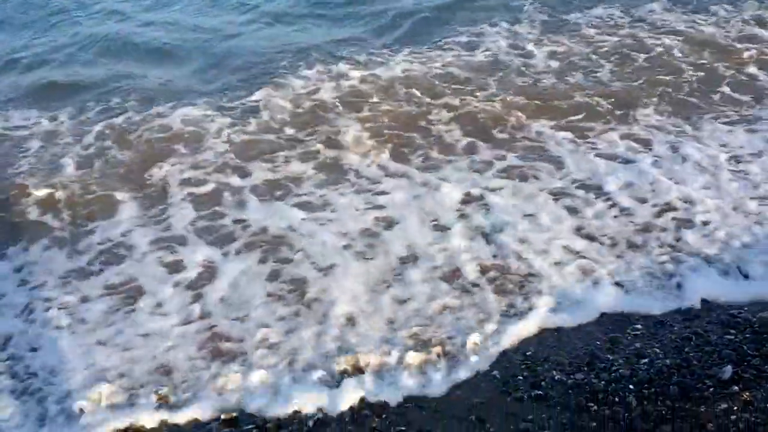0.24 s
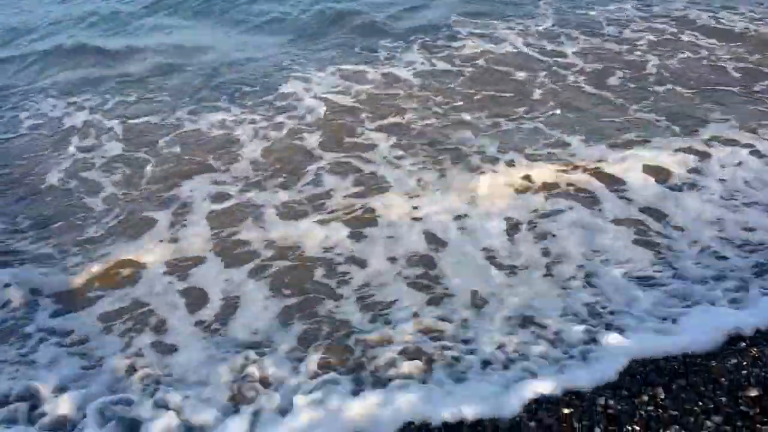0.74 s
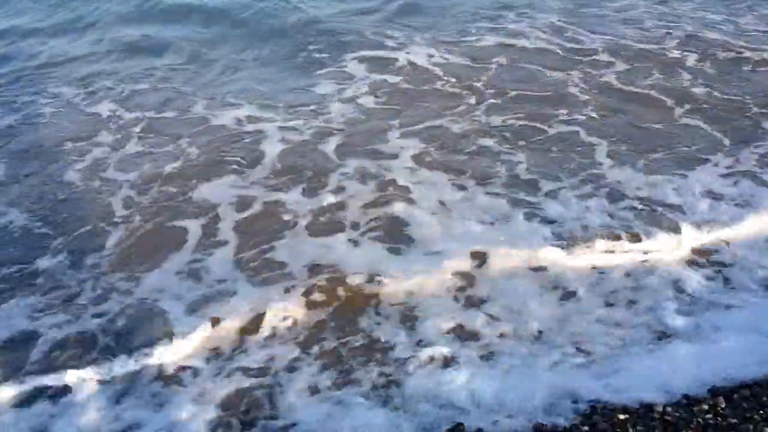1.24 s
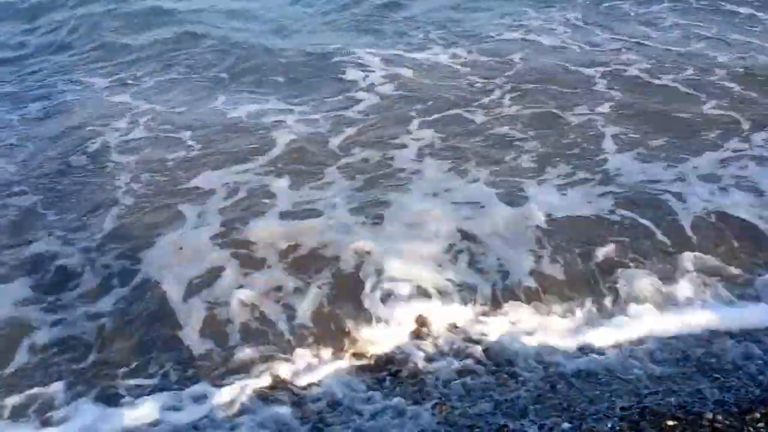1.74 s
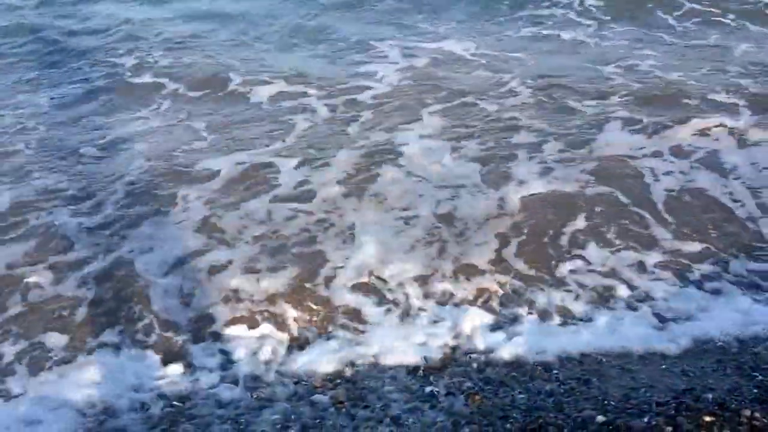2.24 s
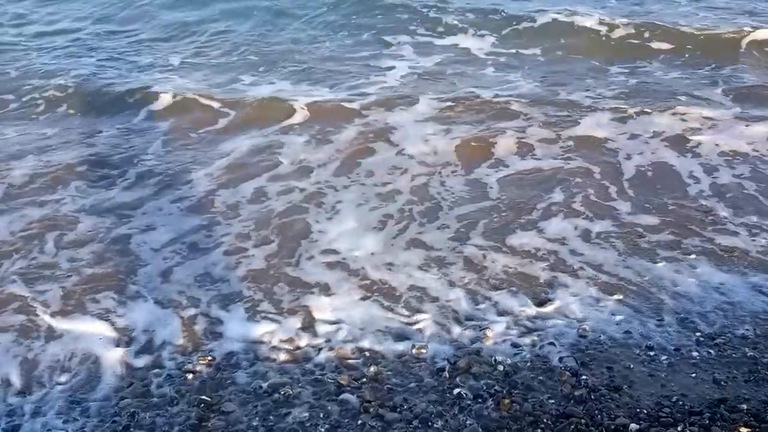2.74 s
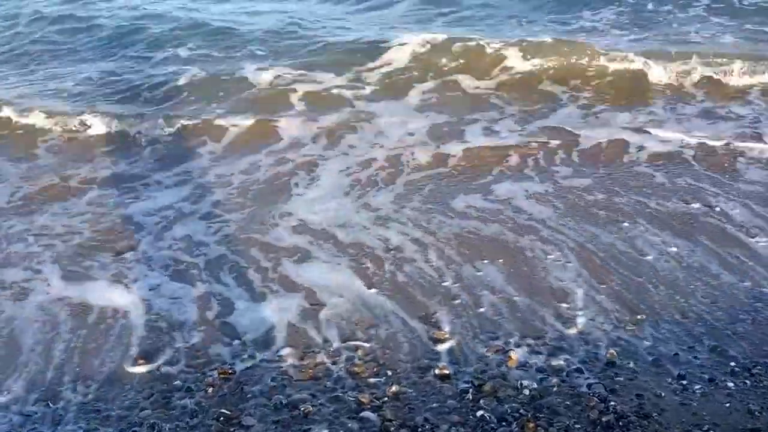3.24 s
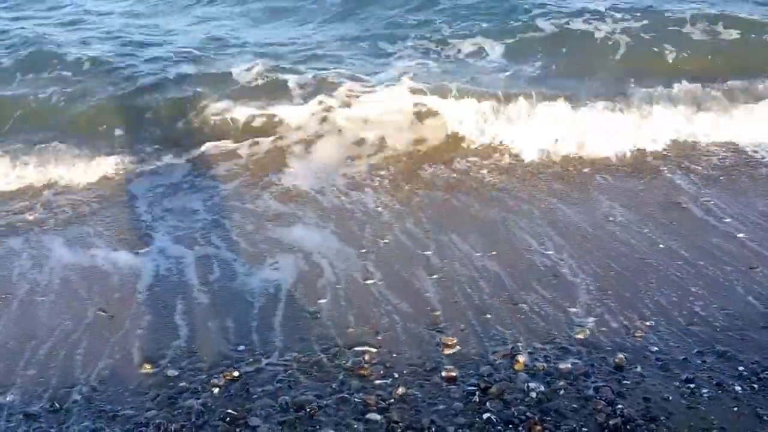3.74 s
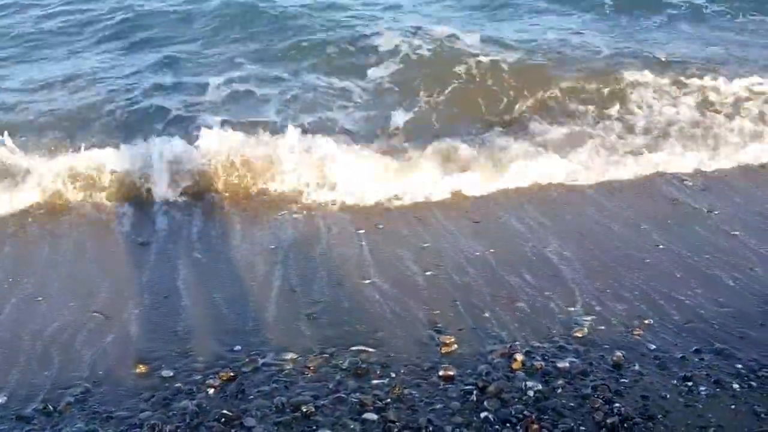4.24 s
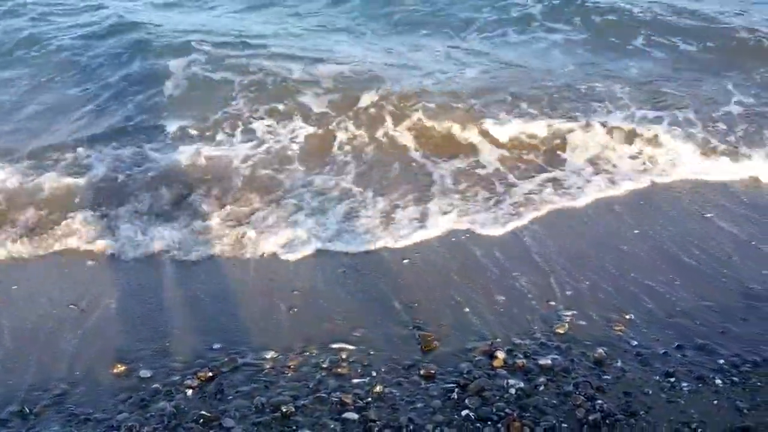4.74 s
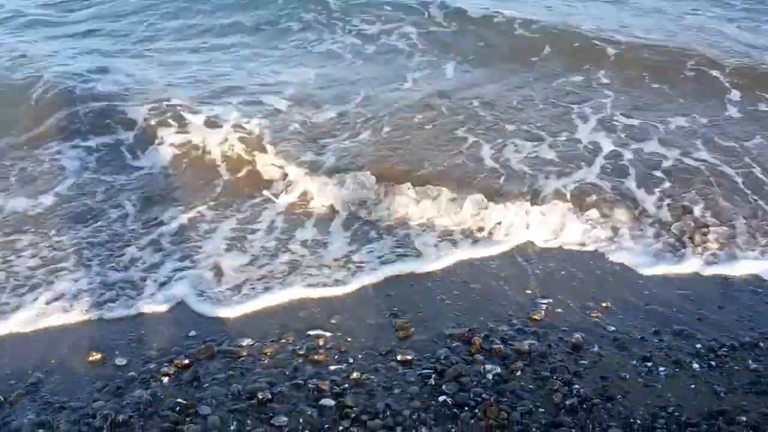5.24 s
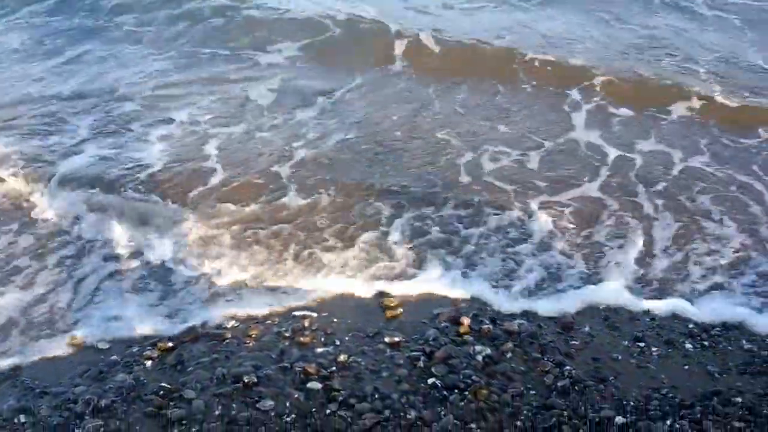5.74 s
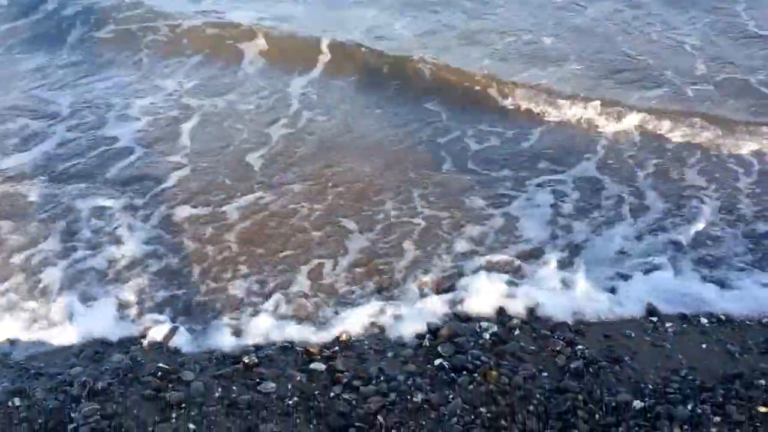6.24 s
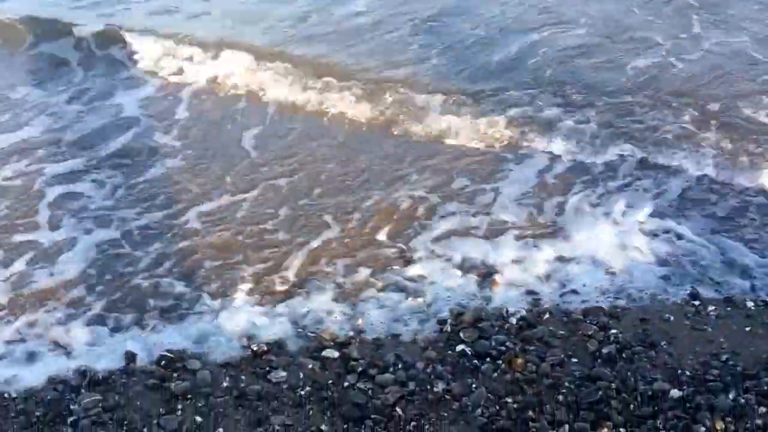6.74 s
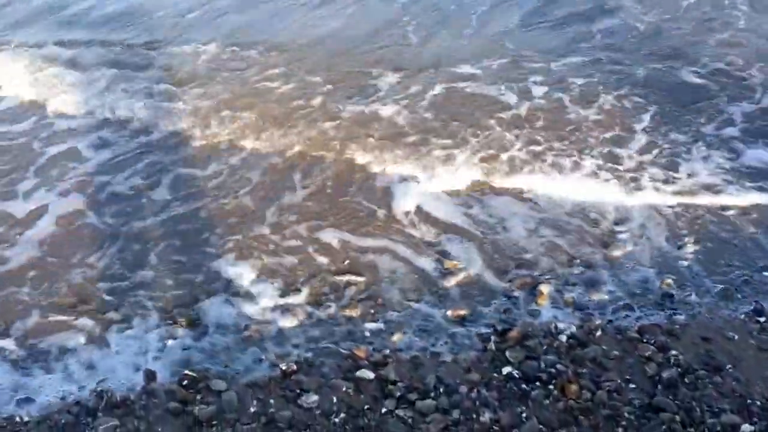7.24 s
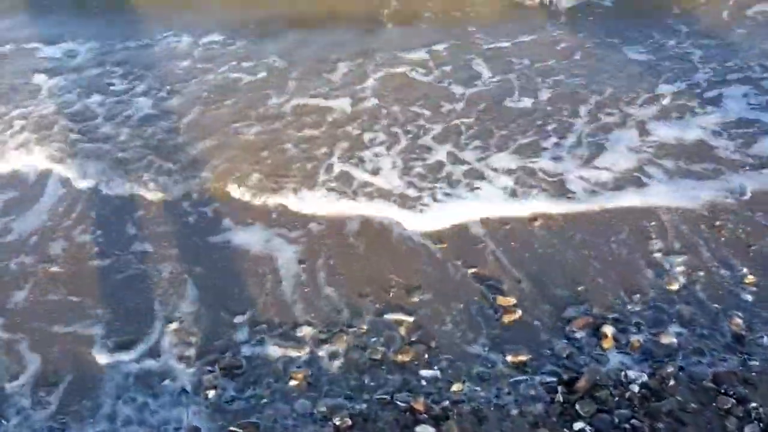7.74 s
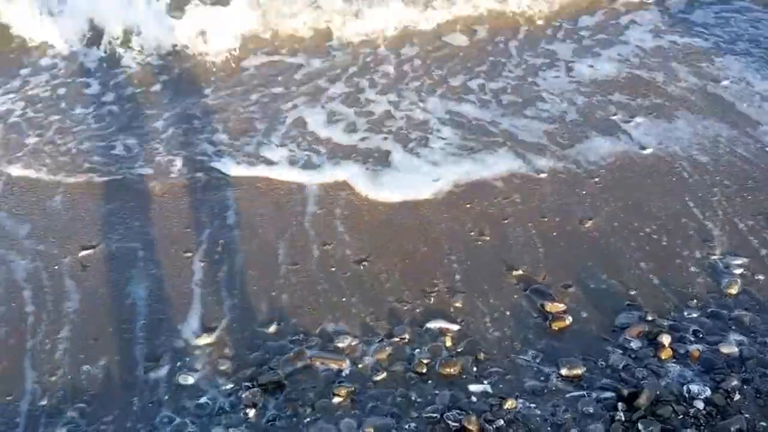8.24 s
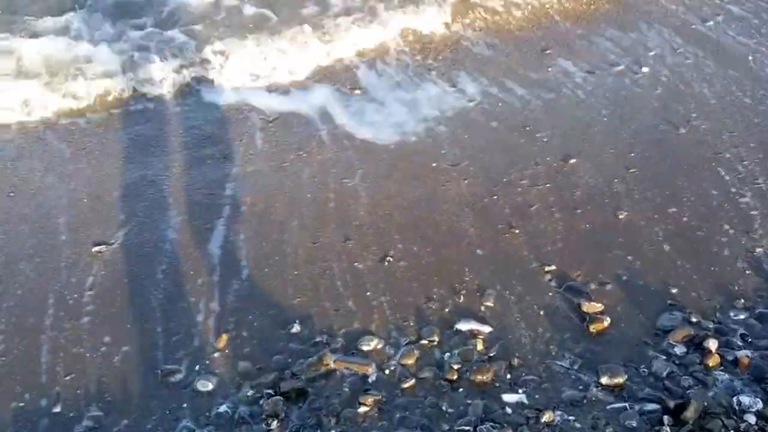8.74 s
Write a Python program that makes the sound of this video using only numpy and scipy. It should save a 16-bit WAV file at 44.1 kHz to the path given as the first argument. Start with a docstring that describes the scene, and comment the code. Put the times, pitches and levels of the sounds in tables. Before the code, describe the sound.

Gusty wind buffets a hand-held microphone throughout, a low rumble that tears into a rough flutter. A few steps behind it, small waves wash up a sand and pebble beach and drain back, with bubbles popping in the foam. The wind dips briefly near three seconds and again near the end, while the surf swells in the middle and at the close. A few faint splashes and stone ticks come through.

```python
"""Gusty wind buffets a hand-held microphone: a low rumble that tears into a rough flutter whenever
the air speeds up. A few steps away, small waves break, run up a sand and pebble beach and drain back.
Crests slap down, stones knock together, bubbles pop in the foam and drops land on the pebbles.
The microphone hisses faintly, and its port rings near 6 kHz."""
import sys
import numpy as np
from scipy import signal
from scipy.fft import rfft, irfft, next_fast_len
from scipy.io import wavfile
from scipy.ndimage import uniform_filter1d, minimum_filter1d, map_coordinates

SR = 44100
rng = np.random.default_rng(int(sys.argv[2]) if len(sys.argv) > 2 else 0)


def store_pcm(level_fs):
    """Save levels as 16-bit WAV."""
    pcm = np.round(np.clip(level_fs, -1, 1) * 32767).astype(np.int16)
    wavfile.write(sys.argv[1], SR, np.atleast_2d(pcm).T)


N = 396459


def amp(db):
    """Decibels to gain."""
    return 10 ** (np.asarray(db) / 20)


def unit(x):
    """Scale to rms 1."""
    return x / np.sqrt(np.mean(x ** 2) + 1e-20)


def clock():
    """The time of every sample."""
    return np.arange(N) / SR


def automation(rows):
    """A lane of straight ramps through (time, value) breakpoints."""
    return np.interp(clock(), *np.transpose(rows))


def swell(time, length):
    """The samples around a time and a bell of height 1 over them, length wide at half height."""
    span = np.arange(max(int((time - length) * SR), 0), min(int((time + length) * SR), N))
    return span, np.cos(np.pi / 2 * (span / SR - time) / length) ** 2


def bursts(rows):
    """An envelope with one bell for each (time, level, length) cue."""
    envelope = np.zeros(N)
    for time, db, length in rows:
        span, bell = swell(time, length)
        envelope[span] += amp(db) * bell
    return envelope


def wobble(rate):
    """Smooth random modulation, rate knots a second."""
    coarse = clock()[::16]
    knots = rng.standard_normal(N // 20)
    return np.interp(clock(), coarse, map_coordinates(knots, [coarse * rate], mode="mirror"))


def filtered(x, response):
    """x through a frequency response."""
    size = next_fast_len(N + SR // 2)
    return irfft(rfft(x, size) * response(np.fft.rfftfreq(size, 1 / SR)), size)[..., :N]


def coloured(x, eq):
    """x through an EQ curve of (frequency, gain) points on a log axis, then scaled to rms 1."""
    points_hz, db = np.transpose(eq)
    return unit(filtered(x, lambda hz: amp(np.interp(np.log(hz + 1), np.log(points_hz), db))))


def patchy(depth_db):
    """White noise with patches of random gain in time and pitch."""
    spectrum = signal.stft(rng.standard_normal(N), nperseg=512)[2]
    patches = uniform_filter1d(rng.standard_normal(spectrum.shape), size=6, axis=0)
    patches = uniform_filter1d(patches, size=10, axis=1)
    return signal.istft(spectrum * amp(depth_db * unit(patches)), nperseg=512)[1][:N]


def grains(count, low_hz, high_hz, cycles, spread_db):
    """Tiny damped rings at random times, most faint and a few strong."""
    when, pitch, size = rng.random((count, 3)).T[:, :, None]
    age = np.arange(96)
    turns = low_hz * (high_hz / low_hz) ** pitch * age / SR
    strength = amp(-spread_db * np.log(np.maximum(size, .003)))
    rings = strength * np.sin(2 * np.pi * turns) * np.exp(-turns / cycles)
    samples = (when * N).astype(int) + age
    return unit(np.bincount(samples.ravel(), rings.ravel(), N)[:N])


# Airy top of the hiss floor: (frequency [Hz], gain [dB])
HISS_EQ = [(2000, -9.5), (6000, -1), (10000, 1.5), (16000, 2.5)]

def mic_hiss(level_db=-64):
    """Faint, steady, fine-grained microphone hiss."""
    hiss = grains(count=16000, low_hz=5000, high_hz=16000, cycles=1.2, spread_db=1.0)
    return amp(level_db) * coloured(hiss, HISS_EQ)


# Surf fader, drawn to swell with the waves and duck under strong wind buffets: (time [s], level [dB])
SURF_RIDE = [(0.0, -44), (0.53, -45), (0.78, -51), (1.02, -48.5), (1.45, -55), (2.35, -51), (3.18, -48),
             (3.46, -43), (4.1, -41), (4.75, -42), (4.92, -48), (5.5, -52), (6.1, -51.5), (6.4, -56.5),
             (6.63, -48), (7.2, -47), (8.1, -41), (8.99, -42)]
# Mid-heavy body of the wash: (frequency [Hz], gain [dB])
WASH_EQ = [(60, -19), (250, -12.5), (650, 5.5), (1000, -2.5), (1600, -5), (2500, -9), (4000, -16),
           (6000, -15), (9000, -27), (12000, -27), (16000, -30)]
# Sparkle of the bubbles, shared by the slaps: (frequency [Hz], gain [dB])
BUBBLE_EQ = [(300, -39), (900, -5), (2500, 7), (4500, 5.5), (7000, 3.5), (16000, -24)]

def surf(wash_db=6, bubble_db=-6, churn_db=1.16):
    """White water rushes, and single bubbles pop in its foam."""
    wash = coloured(patchy(depth_db=0.93), WASH_EQ) * amp(wash_db + churn_db * wobble(25))
    pops = grains(count=14000, low_hz=910, high_hz=14550, cycles=3.1, spread_db=3.0)
    foam = amp(bubble_db) * coloured(pops, BUBBLE_EQ)
    return amp(automation(SURF_RIDE)) * (wash + foam)


# Cues for falling crests: (time [s], level [dB], length [s])
SLAP_CUES = [(1.711, -40, 0.0016), (3.387, -37.5, 0.012)]

def slaps():
    """Crests slap down on shallow water, each a snap of bright noise."""
    return bursts(SLAP_CUES) * coloured(rng.standard_normal(N), BUBBLE_EQ)


# Cues for landing spray: (time [s], level before trim [dB], length [s])
SPRAY_CUES = [(3.3, -48, .03), (4.62, -47.5, 0.11), (6.455, -40.5, 0.011), (6.51, -45.5, 0.12),
              (7.452, -39, .016), (7.495, -37.5, 0.065), (8.058, -41, 0.027)]
# Crisp treble of the drops: (frequency [Hz], gain [dB])
SPRAY_EQ = [(500, -24), (2000, -19), (4500, -1.5), (6100, 4.5), (9000, 0), (16000, 6)]

def spray(trim_db=-2):
    """Thrown drops patter on the pebbles in short, bright bursts."""
    drops = grains(count=30000, low_hz=3000, high_hz=16000, cycles=0.94, spread_db=4.0)
    return amp(trim_db) * coloured(drops, SPRAY_EQ) * bursts(SPRAY_CUES)


# Cues for knocking pebbles: (time [s], level [dB])
PEBBLE_CUES = [(4.795, -35), (6.455, -39), (7.426, -38), (8.036, -27.5), (8.645, -28)]
# Hard, thin click of stone on stone: (frequency [Hz], gain [dB])
STONE_EQ = [(1500, -25), (5000, 9), (7500, 4), (12000, -8), (16000, 4.5)]

def pebbles(t60_s=0.013):
    """Stones rolled by the water meet with a dry tick."""
    age = np.arange(SR // 20) / SR
    envelope = np.zeros(N)
    for time, db in PEBBLE_CUES:
        envelope[round(time * SR):][:len(age)] += amp(db - 60 * age / t60_s)
    return envelope * coloured(rng.standard_normal(N), STONE_EQ)


# Fader ride of the breeze between gusts: (time [s], level [dB])
BREEZE_RIDE = [(0, -16), (0.55, -13.5), (1.1, -17), (1.88, -21), (2.25, -15.5), (2.8, -19), (2.92, -28),
               (3.1, -26.5), (3.35, -23), (3.95, -18.5), (4.8, -27), (5.25, -19), (5.65, -15.5),
               (6.04, -20), (6.9, -18), (7.65, -20), (7.86, -28.5), (8.99, -23.5)]
# Gust cues: (start [s], length [s], base level [dB], base roll-off [Hz], bass knee [x roll-off])
GUST_CUES = [(0.0, .42, -13, 350, 1.05), (0.657, 0.41, -13.5, 415, 0.38), (1.153, 0.13, -15, 447, 0.28),
             (1.349, 0.24, -14.5, 490, 0.27), (1.692, 0.028, -9, 182, 0.43), (2.0, 0.18, -12, 444, 0.092),
             (2.205, 0.068, -10.5, 272, 0.49), (2.335, 0.18, -12.5, 320, 0.068),
             (2.58, 0.15, -14.5, 370, 0.12), (2.775, 0.098, -15.5, 325, 0.13),
             (3.048, 0.021, -25, 190, 0.27), (3.512, .38, -16, 215, 0.4), (4, 0.52, -12.5, 262, 0.26),
             (4.452, 0.733, -13, 210, 0.32), (5.307, 0.24, -12.5, 333, 0.25), (5.739, .12, -11, 434, 0.64),
             (5.874, 0.056, -10, 280, 0.16), (6.083, 0.24, -13, 325, .25), (6.208, 0.47, -12.5, 507, 0.11),
             (6.533, 0.29, -15.5, 434, 0.25), (6.972, .09, -14, 216, 0.38), (7.078, .15, -12.5, 292, 0.55),
             (7.248, 0.318, -14.5, 230, 0.17), (7.724, 0.044, -13.5, 175, 0.26),
             (7.911, 0.23, -22, 197, 0.19), (8.17, 0.085, -17.5, 185, 0.22), (8.393, 0.075, -21, 224, 0.68),
             (8.932, .1, -20, 220, 0.23)]

def gusts(attack_s=0.022, release_s=0.024, breeze_hz=223, hz_per_db=13.5, breeze_knee=0.59):
    """Level, roll-off and bass knee of the air: each gust rises out of the breeze, holds and lets go."""
    breeze_db = automation(BREEZE_RIDE)
    rolloff_hz = breeze_hz + hz_per_db * (breeze_db - breeze_db.mean())
    breeze = np.array([breeze_db, rolloff_hz, np.full(N, breeze_knee)])
    weight, lanes, t = np.zeros(N), np.zeros((3, N)), clock()
    for start, length, db, hz, knee in GUST_CUES:
        span = slice(max(int((start - attack_s) * SR), 0), int((start + length + release_s) * SR))
        age = t[span] - start
        fade = np.clip(.5 + age / attack_s, 0, 1) * np.clip(.5 + (length - age) / release_s, 0, 1)
        weight[span] += fade
        lanes[:, span] += [fade * db, fade * hz, fade * knee]
    # the breeze fills the gaps; overlapping gusts are averaged
    return (lanes + np.maximum(1 - weight, 0) * breeze) / np.maximum(weight, 1)


# Accents of faster air: (time [s], roll-off [Hz], length [s])
FLURRY_CUES = [(0.401, 800, 0.0046), (0.685, 600, 0.012), (0.716, 1130, 0.0075), (0.86, 554, 0.016),
               (1.433, 850, .0035), (1.656, 660, 0.025), (1.902, 410, 0.0059), (2.013, 600, 0.0085),
               (2.162, 530, 0.0092), (2.349, 520, 0.011), (2.38, 630, 0.019), (2.481, 494, 0.0082),
               (2.623, 600, 0.0085), (2.667, 625, 0.015), (2.785, 536, 0.02), (4.295, 373, 0.044),
               (4.927, 430, 0.0046), (5.143, 420, 0.027), (5.485, 715, 0.058), (5.846, 730, 0.044),
               (5.895, 790, 0.013), (6.15, 660, 0.0079), (6.217, 686, 0.033), (6.288, 736, 0.034),
               (6.353, 706, 0.078), (6.49, 634, 0.051), (7.081, 500, 0.022), (7.212, 470, 0.011),
               (7.466, 504, 0.029), (7.547, 506, 0.014)]

def flurries(base_hz, count=150, typical_rise=0.15, typical_s=0.0078, full_rough_hz=400):
    """The roll-off as flurries lift it: small random ones, rougher in fast air, and the cued accents."""
    lift = np.zeros(N)
    for when, size, width in rng.random((count, 3)):
        span, bell = swell(when * N / SR, typical_s * (.5 + width))
        lift[span] = np.maximum(lift[span], 2 * typical_rise * size * bell)
    roughness = np.minimum(base_hz / full_rough_hz, 1) ** 0.63
    rolloff_hz = base_hz * (1 + roughness * (lift - lift.mean()))
    for time, peak_hz, length in FLURRY_CUES:
        span, bell = swell(time, length)
        rolloff_hz[span] += bell * (peak_hz - rolloff_hz[span])
    return rolloff_hz


# Low-pass slope of turbulence dying away in smaller eddies: (frequency [x roll-off], gain [dB])
EDDY_SLOPE = [(0, 0.5), (1, -3), (2, -14.5), (4, -32.5), (8, -64), (16, -160)]

def eddies(rolloff_hz, knee):
    """Turbulence at rms 1: strongest at the pitch of the main eddies, falling fast above it."""
    centres_hz = np.array([30, 80, 160, 280, 450, 700, 1000, 1400, 1900, 2500, 3300, 4400, 6000, 8000])
    size = next_fast_len(N)
    hz = np.fft.rfftfreq(size, 1 / SR)
    # one noise is split into overlapping bands whose gains follow the air speed
    crossover = np.array([np.interp(hz, centres_hz, row, right=0) for row in np.eye(len(centres_hz))])
    bands = irfft(crossover * rfft(rng.standard_normal(size)), size)[:, :N]
    t, coarse = clock(), slice(None, None, 8)
    ratio = centres_hz[:, None] / rolloff_hz[coarse]
    low_pass = amp(np.interp(ratio, *np.transpose(EDDY_SLOPE)))
    high_pass = ratio / np.sqrt(ratio ** 2 + knee[coarse] ** 2)
    gains = low_pass * high_pass
    gains /= np.sqrt(bands.var(axis=1) @ gains ** 2)  # constant power through the sweep
    return unit(sum(np.interp(t, t[coarse], gain) * band for gain, band in zip(gains, bands)))


def wind(flurry_db=2, lump_db=1.1, flutter_db=1.02, lump_sweep=0.045, flutter_sweep=0.135):
    """Air buffets the port: faster is brighter, and each eddy jolts loudness and brightness together."""
    base_db, base_hz, knee = gusts()
    rolloff_hz = flurries(base_hz)
    lumps, flutter = wobble(50), wobble(280)
    db = base_db + flurry_db * np.log(rolloff_hz / base_hz) + lump_db * lumps + flutter_db * flutter
    # the smallest, quickest eddies tear the top of the roar into a crackle
    rolloff_hz *= np.exp(lump_sweep * lumps + flutter_sweep * flutter)
    return amp(db) * eddies(rolloff_hz, knee)


def scene():
    """The mono mix: wind up front, the shore break behind it."""
    return (wind() + surf() + spray() + slaps() + pebbles() + mic_hiss())[None]


# Resonant peak of the microphone port: (frequency [Hz], width [Hz], gain [dB])
PORT_PEAK = (6110, 745, 11.06)

def record(dry, low_cut_hz=60, high_cut_hz=15750, ceiling=0.94):
    """The microphone chain: port ring, low cut, a smooth peak limiter and a brick-wall high cut."""
    port_hz, width_hz, port_db = PORT_PEAK
    resonance = lambda f: 1j * f * width_hz / (port_hz ** 2 - f ** 2 + 1j * f * width_hz)
    ring = lambda f: 1 + (amp(port_db) - 1) * resonance(f)
    low_cut = lambda f: signal.freqs(*signal.butter(5, low_cut_hz, "high", analog=True), f)[1]
    mic = filtered(dry, lambda f: ring(f) * low_cut(f))
    needed_gain = np.minimum(ceiling / (np.abs(mic) + 1e-9), 1)
    limiter_gain = uniform_filter1d(minimum_filter1d(needed_gain, size=401), size=301)
    return filtered(mic * limiter_gain, lambda f: f < high_cut_hz)


dry = scene()
out = record(dry)
store_pcm(out)
```